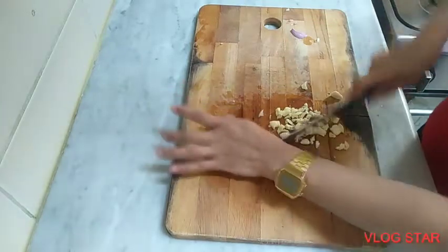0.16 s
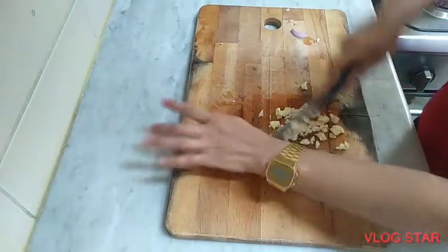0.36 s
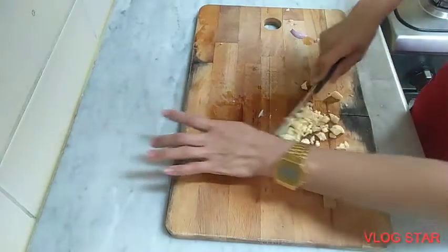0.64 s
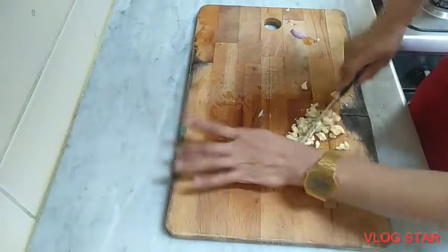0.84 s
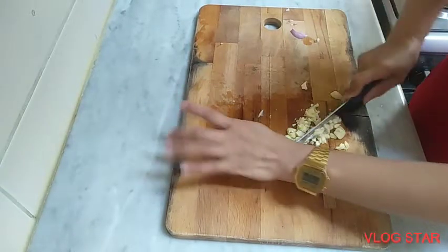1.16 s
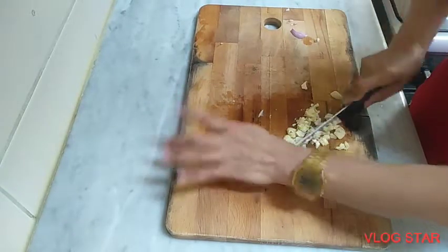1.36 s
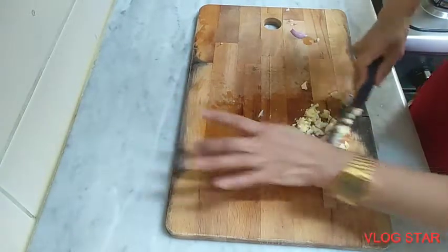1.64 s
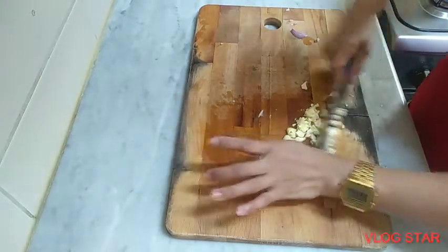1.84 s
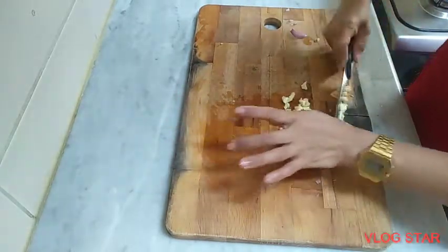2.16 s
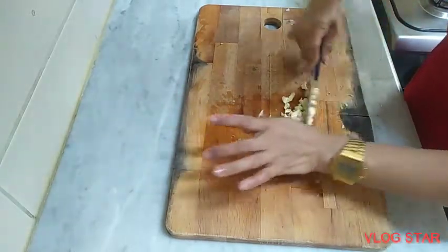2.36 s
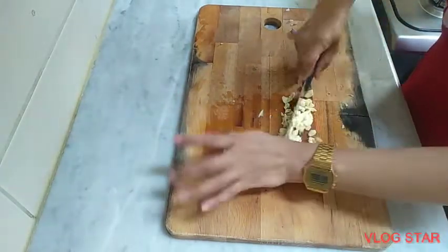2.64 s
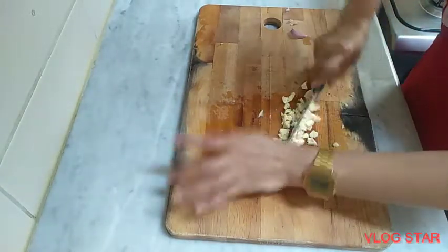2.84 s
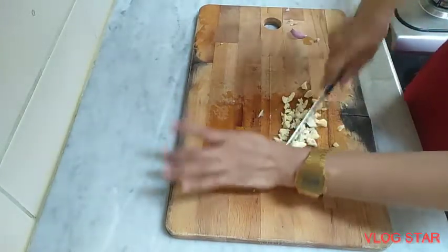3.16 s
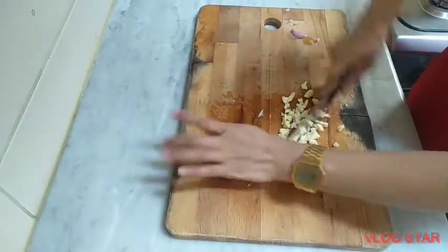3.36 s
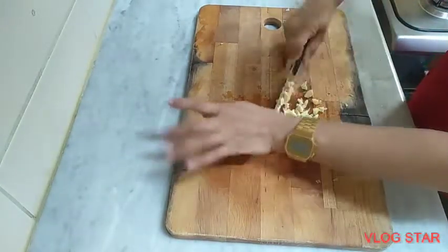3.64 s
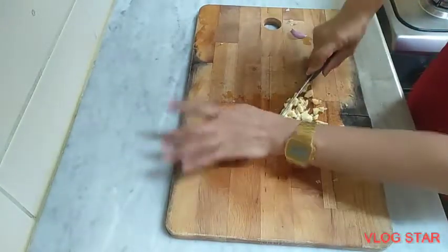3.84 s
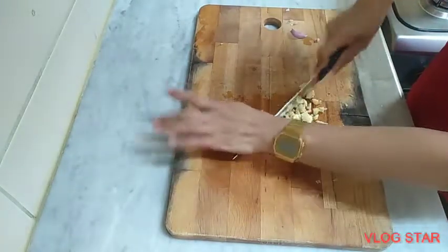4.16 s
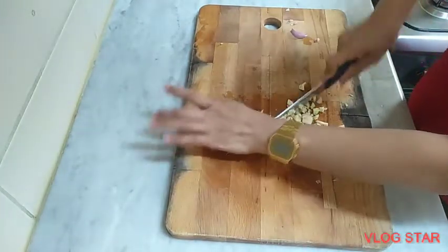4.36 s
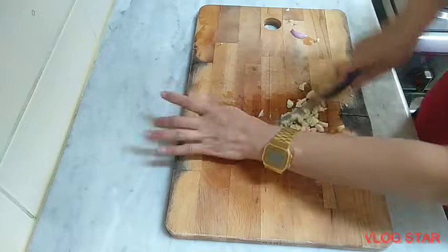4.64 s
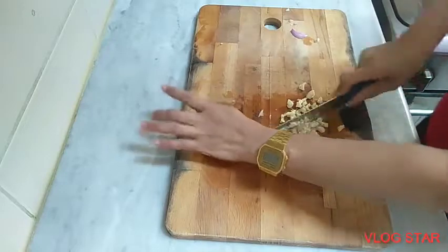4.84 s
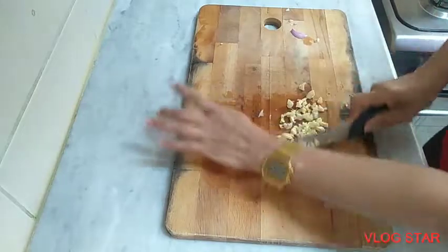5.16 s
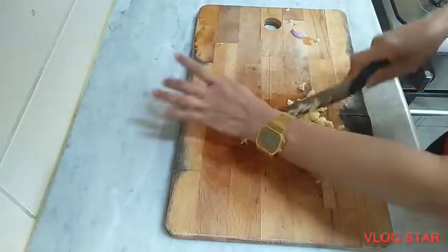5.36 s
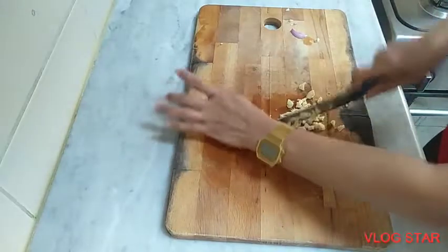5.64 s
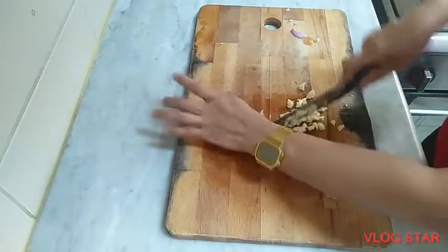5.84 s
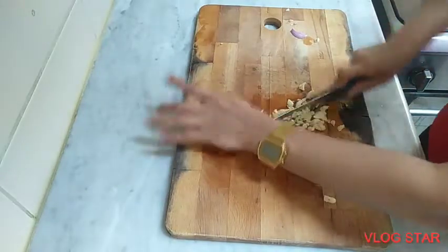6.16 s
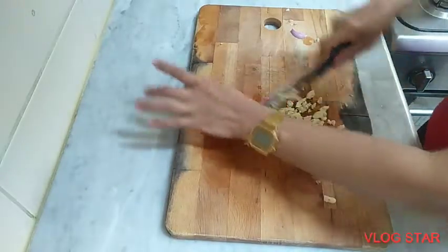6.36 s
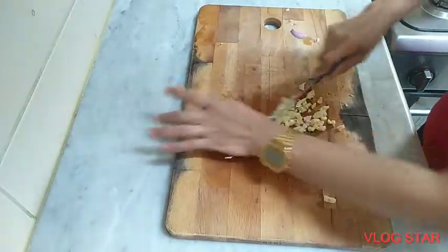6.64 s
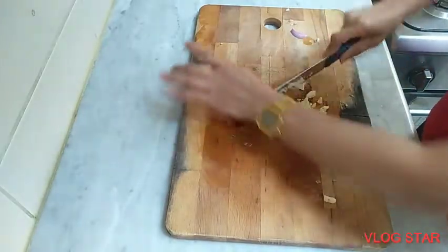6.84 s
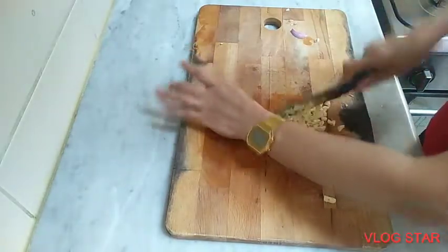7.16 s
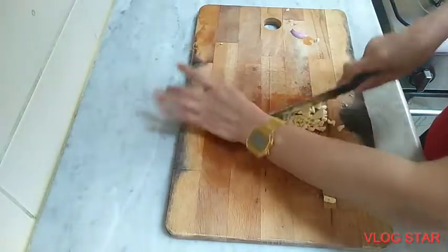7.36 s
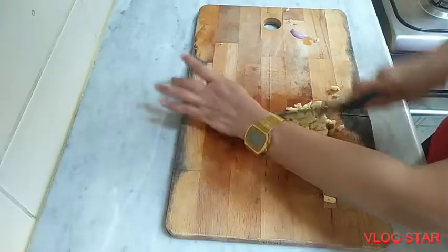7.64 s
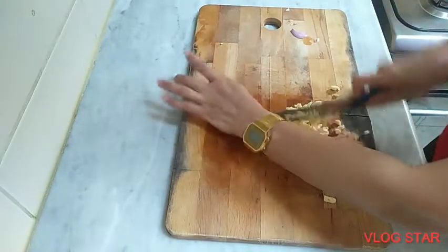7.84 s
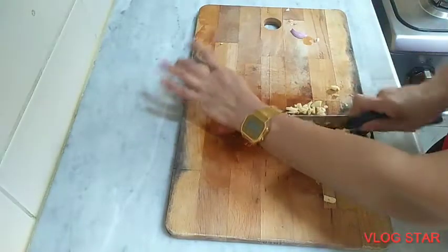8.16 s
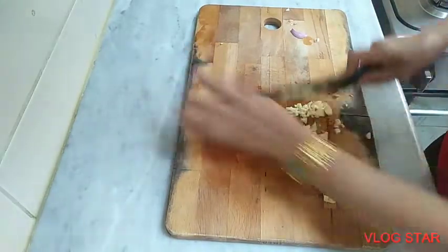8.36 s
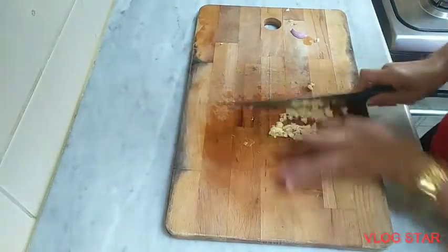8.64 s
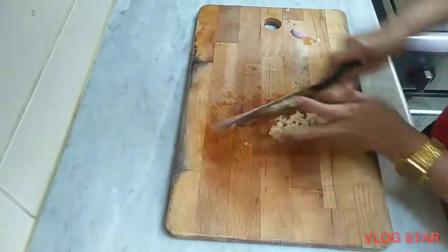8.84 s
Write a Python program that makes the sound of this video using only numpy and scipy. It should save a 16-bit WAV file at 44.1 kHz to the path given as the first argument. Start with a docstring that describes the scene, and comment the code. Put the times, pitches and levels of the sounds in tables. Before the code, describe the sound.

A steel knife minces garlic on a wooden board lying on a stone counter. Small moist crunches with light ticks and dull thuds come roughly four per second, broken by short hissing scrapes and much louder hollow wooden knocks. Knocks are sparse at first, then cluster near five to seven seconds and at the end. Close stereo microphone in a small, hard, tiled kitchen with short bright reverberation; the hardest blows slightly overload.

```python
"""Mincing garlic on a wooden board

A kitchen knife minces garlic on a wooden board lying on a stone counter, in a small tiled kitchen.
Blows on bare wood excite the damped modes of the board; sweeps and crunches are trains of tiny random
snaps, shaped by the force on the blade and filtered by what it touches. Echoes, standing waves and a
diffuse tail return every stroke; a close stereo microphone overloads on the hardest knocks."""
import sys
import numpy as np
from scipy import signal
from scipy.fft import rfft, irfft
from scipy.io import wavfile
from scipy.ndimage import uniform_filter1d

SR = 44100
rng = np.random.default_rng(int(sys.argv[2]) if len(sys.argv) > 2 else 0)


def unload_wav(signal):
    """Save mono or channel-first audio to the path in sys.argv[1] as 16-bit WAV at rate SR, clipped to [-1, 1]."""
    wavfile.write(
        sys.argv[1],
        SR,
        np.round(np.clip(np.atleast_2d(signal).T, -1, 1) * 32767).astype(np.int16),
    )


N = 396900  # samples, 9 s

# All spectra in level_db_per_hz are relative: the filters have unit energy.
# faint room noise: frequency_hz, level_db_per_hz
QUIET_SPECTRUM = [(20, -11), (50, -2.5), (120, -11), (220, -9), (400, -33), (1500, -42), (8000, -26),
                  (15000, -32)]
# near surfaces: left_delay_s, right_delay_s, level_db
ECHOES = [(.0009, 0.001, -10.5), (.0037, 0.0026, -5.5), (.0052, 0.005, -8), (.0072, 0.0035, -6.5),
          (.0096, 0.013, -12), (0.0108, 0.013, -20.5)]
# standing waves of the kitchen: frequency_hz, t60_s, energy_db (re direct sound)
STANDING_WAVES = [(99.23, 0.31, -20), (142.7, 0.4, -24.5), (185.3, 0.27, -23), (266, 0.5, -35),
                  (312, 1, -32), (628, 1, -39.5), (835, 0.15, -35), (925, 0.15, -26), (1502, 0.23, -37.5),
                  (1560, 0.092, -41)]
# reverberant level before build-up: frequency_hz, level_db (re direct sound)
TAIL_LEVEL = [(50, 6.5), (100, 14.5), (250, 7), (500, 4.5), (900, 0.5), (1400, -4.5), (2500, 1.5),
              (4000, 2.5), (8000, -1.83), (14000, -2)]
# reverberant decay: frequency_hz, t60_s
TAIL_T60 = [(60, 0.91), (160, 0.1), (420, 0.43), (1100, 0.41), (2900, 0.53), (7700, 0.47), (14000, 0.44)]
# reverberant build-up: frequency_hz, build_up_s
TAIL_BUILD_UP = [(100, 0.024), (300, 0.0047), (1000, 0.003), (8000, 0.0023)]
# left port minus right port: frequency_hz, difference_db
PORT_TILT = [(60, 5.5), (250, -7.5), (600, 2.5), (1300, -2.2), (2200, -0.5), (5000, -0.5), (7000, -5),
             (9000, 6.5), (14000, 3.5)]
# blade sweeping the board: greatest_force_s, length_s, hiss_db, rasp_db, judder_db
SCRAPES = [(0.669, .1, -33.5, -32, -41.5), (1.913, 0.14, -30, -31.5, -52), (2.297, 0.048, -43, -71, -57.5),
           (2.353, 0.059, -28.5, -30, -41.5), (3.679, 0.11, -44.5, -45.5, -36.5),
           (5.255, 0.16, -32, -26.5, -39), (5.757, 0.13, -43.5, -44.5, -54), (5.875, 0.13, -48, -47, -65),
           (6.689, .13, -33.5, -33, -45.5), (7.029, .07, -32, -40, -36.5), (7.279, 0.052, -33, -44, -41),
           (8.567, 0.064, -50, -72, -67), (8.674, 0.18, -36.5, -54.5, -37)]
# uneven stick and slip of the edge: multiple_of_judder_pitch, level_db_per_hz
JUDDER_SPECTRUM = [(.3, -39), (.6, -9), (.8, -8), (1.05, -2.5), (1.5, -8.5), (2.2, -17.5), (5, -48.5)]
# wood under a rubbing edge: frequency_hz, level_db_per_hz
RASP_SPECTRUM = [(300, -29), (650, -32), (880, 2.5), (1020, -8), (1250, 3.5), (1650, -4), (2100, -9.5),
                 (3000, -20.5), (5000, -29)]
# bursting garlic cells, also the hiss of swept pieces: frequency_hz, level_db_per_hz
CRUNCH_SPECTRUM = [(400, -14.5), (1500, -6), (2800, -5.5), (4000, -11), (5200, -8), (7000, -0.5), (8600, 1),
                   (10500, -8), (13800, -12), (15000, -32.5)]
# blade through the heap: give_way_s, bite_s (before it), crunch_db, sink_s (on to the board), thud_db
CHOPS = [(.012, 0.12, -38.5, .018, -34), (.235, 0.0075, -31.5, 0.016, -31),
         (.909, 0.0049, -26, 0.0027, -54), (1.177, 0.016, -35, 0.015, -47.5),
         (1.407, 0.02, -39, 0.00534, -35), (1.82, 0.032, -47.5, 0.0023, -56),
         (2.615, 0.0066, -30.5, 0.0035, -47), (2.903, .033, -28.5, 0.0019, -49),
         (3.129, 0.02, -30, 0.0042, -53.5), (3.351, 0.017, -28.5, 0.0029, -46),
         (3.874, 0.0063, -33, 0.03, -42), (4.094, 0.0073, -33.5, 0.021, -43.5),
         (4.325, 0.022, -37.5, 0.0046, -32), (4.529, 0.018, -33, 0.026, -46.5),
         (4.787, 0.032, -37, 0.0026, -47), (5.713, .006, -37, 0.0021, -58),
         (5.995, 0.062, -36, 0.0019, -65.5), (6.228, 0.031, -34.5, 0.0039, -41.5),
         (7.514, 0.025, -34, 0.0029, -47.5), (7.728, 0.0099, -24, 0.0026, -57),
         (7.976, 0.031, -34.5, 0.0025, -60.5), (8.189, 0.016, -29.5, 0.0027, -46.5)]
# blade on bare wood: start_s, level_db, hardness_hz (corner of the blow), place (0 mid-board to 1 near edge)
KNOCKS = [(.54, -11.5, 1460, 0.52), (0.8896, -7, 3190, 0.62), (1.822, -30.5, 1500, 0.27),
          (2.6168, -14.5, 994, 0.25), (3.6146, -10, 1065, 0.44), (5.145, -14.5, 1147, 0.42),
          (5.4867, -7, 1800, 0.43), (6.5814, -13, 1650, 0.35), (6.9322, -11, 950, 1),
          (7.222, -10, 2135, 0.43), (8.579, -9.5, 1126, 0.76), (8.97, -8, 3400, 0.46)]
# board with the blade on it, relative levels: frequency_hz, t60_s, mid_board_db, near_edge_db
BOARD_MODES = [(185, 0.04, -40.5, -40), (287.7, 0.061, -25.5, -30.5), (410, 0.035, -21, -25),
               (560, 0.062, -30, -29.5), (595, .033, -22.5, -20.5), (860, 0.018, -5.5, -4),
               (901.6, 0.028, -7, -3), (1217, 0.019, 3, -6), (1407, 0.017, 1, -2.5), (1659, 0.017, -9, 5),
               (2160, 0.011, -8, 0), (2297, 0.021, -4, -11), (2850, 0.017, -16, -18.5),
               (3400, .007, -22.5, -26), (5200, 0.0014, -17.5, -30)]
# board pressed on the counter: multiple_of_thud_pitch, level_db_per_hz
THUD_SPECTRUM = [(.25, -32.5), (.6, -5), (1, -2.5), (1.8, -7.5), (3.2, -8), (8, -47), (20, -71.5)]
# tick of the steel blade: frequency_hz, level_db_per_hz
BLADE_SPECTRUM = [(1500, -5), (2900, -10), (3900, -19), (5000, -11.5), (6000, -14.5), (7100, -3.5),
                  (8600, -8), (10500, -18), (14000, -24), (15500, -27.5)]
# short dry noise burst at the start of a knock: frequency_hz, level_db_per_hz
BURST_SPECTRUM = [(800, -20), (2000, -1), (3000, -2), (3600, 0), (4000, -12), (4800, -4.5), (6000, -9.5),
                  (9000, -22), (15000, -34.5)]

QUIET_DB = -72.5
# the knife moves about, so the tail passes from one shape to the next in this time
DRIFT_S = 0.8006
# upper band limit of the microphone channel
BAND_LIMIT_HZ = 14650
# the force builds for this share of a sweep, then lets go
SWEEP_RISE_SHARE = 0.66
# the edge rubs the wood first and meets the pieces a moment later
HISS_LAG_S = .008
# a faster sweep hisses louder and judders faster: pitch at the reference hiss, hiss growth with pitch
JUDDER_HZ, JUDDER_HISS_DB, HISS_DB_PER_OCTAVE = 307, -32.5, 9.5
# decay constant once the garlic gives way; tick re the crunch, less after a slow bite
RELEASE_S, SNAP_DB, SNAP_DB_PER_S = 0.0092, -5.5, -190
# landing rasp: its place between crunch and thud in level, an offset, and the bite's share of its swell
RASP_THUD_SHARE, RASP_DB, RASP_BITE_SHARE = 0.33, 1.5, 0.49
# a heavier landing is a shorter push, so its thud is higher: pitch at the reference thud, thud growth
LANDING_HZ, LANDING_DB, LANDING_DB_PER_OCTAVE = 155, -43, 29
# a harder blow brings out more steel: tick re the knock at the usual hardness, growth with hardness
STEEL_DB, USUAL_HARDNESS_HZ, STEEL_DB_PER_OCTAVE = -26, 1500, 8
# noise burst re the knock at the usual hardness, growth with hardness, decay constant
BURST_DB, BURST_DB_PER_OCTAVE, BURST_S = -24.5, 4, 0.0017
# a blow mid-board presses the counter most: thud re the knock there, change from there to the edge
MID_THUD_DB, THUD_CHANGE_TO_EDGE_DB = -14, -31


def amp(db):
    """The decibel is logarithmic: level to amplitude gain."""
    return 10 ** (np.asarray(db) / 20)


def read(points, hz):
    """Pitch is heard by ratio: a table of (Hz, value) is interpolated over log frequency."""
    f, value = np.transpose(points)
    return np.interp(np.log(hz + 1), np.log(f), value)


def add(mix, s, sound):
    """Superposition: a sound is summed into the mix at time s."""
    part = mix[max(round(s * SR), 0):][:len(sound)]
    part += sound[:len(part)]


def colour(x, points, size=4096):
    """Minimum phase: the folded cepstrum of a spectrum gives a causal filter of unit energy."""
    log_gain = np.log(amp(read(points, np.fft.rfftfreq(size, 1 / SR))))
    cepstrum = irfft(log_gain)[:size // 2]
    cepstrum[1:] *= 2
    taps = irfft(np.exp(rfft(cepstrum, size)))[:size // 2]
    return signal.oaconvolve(x, taps / np.linalg.norm(taps))[:len(x)]


def at_level(hit, db):
    """Energy normalisation: the energy of a hit, spread over 10 ms, has the given level."""
    energy = np.sum(hit ** 2)
    return amp(db) * hit / np.sqrt(energy / (SR / 100))


def ring(hz, t60, t):
    """Damped resonance: a sine that falls 60 dB in t60."""
    return np.exp(-np.log(1000) * t / t60) * np.sin(2 * np.pi * hz * t)


def room_noise():
    """Stationary noise: filtered random pressure, faint and mostly low."""
    return amp(QUIET_DB) * colour(rng.standard_normal(N), QUIET_SPECTRUM)


def reverberation(rise_s=.004, size=36000):
    """Diffuse field: stereo noise whose bass builds up last and whose bands decay at their own rates."""
    hz, t, z = signal.stft(rng.standard_normal((2, size)), SR, nperseg=512)
    t60 = read(TAIL_T60, hz)[:, None]
    build_up_s = read(TAIL_BUILD_UP, hz)[:, None]
    growth = 1 - np.exp(-(t / build_up_s) ** 2)
    decay = np.exp(-np.log(1000) * t / t60)
    unit_energy = np.sqrt(2 * np.log(1000) / (t60 * SR))  # of the decay alone
    level = amp(read(TAIL_LEVEL, hz))[:, None]
    tail = signal.istft(z * growth * decay * unit_energy * level, SR, nperseg=512)[1][:, :size]
    onset = 1 - np.exp(-(np.arange(size) / SR / rise_s) ** 2)
    return tail * onset


def kitchen(x, shared_hz=420, order=6, count=4, size=36000):
    """Room response: direct sound, near echoes, standing waves and a tail that changes as the knife moves."""
    t, near = np.arange(size) / SR, np.zeros((2, size))
    for left_s, right_s, db in ECHOES:
        near[[0, 1], [round(left_s * SR), round(right_s * SR)]] += amp(db)
    near = uniform_filter1d(near, size=4, axis=1)  # clutter scatters the treble of the echoes
    near[0, 0] = near[1, 1] = 1  # the direct sound reaches the left port one sample earlier
    for hz, t60, db in STANDING_WAVES:
        wave = ring(hz, t60, t)
        near += amp(db) * wave / np.linalg.norm(wave)
    out = signal.oaconvolve(x[None], near, axes=1)[:, :N]
    # long waves reach both ports alike
    high_pass = signal.butter(order, shared_hz, "high", fs=SR, output="sos")
    for k in range(count):
        # each tail fades in and out in turn, overlapping its neighbours
        turn = (np.arange(N) / SR / DRIFT_S + k) % count
        share = np.sin(np.pi / 2 * np.minimum(turn, 2))
        mid, side = reverberation()
        side = signal.sosfilt(high_pass, side)
        tail = np.array([mid + side, mid - side]) / np.sqrt(2)
        out += signal.oaconvolve((x * share)[None], tail, axes=1)[:, :N]
    return out


def grains(per_s, spread_db, clump_db, size=300):
    """Shot noise: dense tiny snaps of uneven size, louder and softer in clumps, at unit level."""
    clumps = uniform_filter1d(rng.standard_normal(N), size)
    uneven_db = spread_db * np.minimum(rng.exponential(1, N), 4)
    sizes_db = uneven_db + clump_db * np.tanh(clumps / clumps.std())
    happens = rng.random(N) < per_s / SR
    snaps = rng.standard_normal(N) * happens * amp(sizes_db)
    return snaps / snaps.std()


def scrapes(hiss_swell=.9, wood_swell=.7, size=16000):
    """Stick and slip: the edge drags wet pieces that hiss over wood that rasps and judders."""
    t, out = np.arange(size) / SR, np.zeros(N)
    slips = [np.pad(grains(per_s=4300, spread_db=-0.5, clump_db=5.0), (0, size)) for _ in range(3)]
    for s, length_s, hiss_db, rasp_db, judder_db in SCRAPES:
        rise_s = SWEEP_RISE_SHARE * length_s
        start = s - rise_s
        force = np.interp(t, [0, rise_s, length_s], [0, 1, 0])
        hiss, rasp, judder = (snaps[round(start * SR):][:size] for snaps in slips)
        judder_hz = JUDDER_HZ * 2 ** ((hiss_db - JUDDER_HISS_DB) / HISS_DB_PER_OCTAVE)
        judder_spectrum = [(multiple * judder_hz, db) for multiple, db in JUDDER_SPECTRUM]
        wood_force = force ** wood_swell
        add(out, start + HISS_LAG_S, amp(hiss_db) * colour(hiss * force ** hiss_swell, CRUNCH_SPECTRUM))
        add(out, start, amp(rasp_db) * colour(rasp * wood_force, RASP_SPECTRUM))
        add(out, start, amp(judder_db) * colour(judder * wood_force, judder_spectrum))
    return out


def pressure(since, rise_s, fall_s):
    """Loading and release: exponential swell up to time zero, exponential decay after it."""
    return np.exp(np.minimum(2 * since / rise_s, -since / fall_s))


def tick(db, chatter_s=0.00088, chatter_db=-15, size=2000):
    """Impulsive contact: one sharp meeting of the edge and a brief chatter, bright with steel."""
    decay = np.exp(-np.arange(size) / SR / chatter_s)
    chatter = amp(chatter_db) * rng.standard_normal(size) * decay
    return at_level(colour(signal.unit_impulse(size) + chatter, BLADE_SPECTRUM), db)


def thud(db, hz, size=4000):
    """Momentum transfer: the stroke presses the board against the counter in one dull push."""
    spectrum = [(multiple * hz, push_db) for multiple, push_db in THUD_SPECTRUM]
    return at_level(colour(signal.unit_impulse(size), spectrum), db)


def chops():
    """Fracture: the crunch swells until the garlic gives way with a tick; the blade lands with rasp and thud."""
    t, out, crunch, rasp = np.arange(N) / SR, np.zeros(N), np.zeros(N), np.zeros(N)
    for s, bite_s, crunch_db, sink_s, thud_db in CHOPS:
        near = abs(t - s) < .2
        since = t[near] - s
        rasp_db = RASP_DB + crunch_db + RASP_THUD_SHARE * (thud_db - crunch_db)
        rasp_rise_s = RASP_BITE_SHARE * bite_s + sink_s / 2
        crunch[near] += amp(crunch_db) * pressure(since, bite_s, RELEASE_S + sink_s / 2)
        rasp[near] += amp(rasp_db) * pressure(since - sink_s, rasp_rise_s, RELEASE_S)
        thud_hz = LANDING_HZ * 2 ** ((thud_db - LANDING_DB) / LANDING_DB_PER_OCTAVE)
        add(out, s, tick(crunch_db + SNAP_DB + SNAP_DB_PER_S * bite_s))
        add(out, s + sink_s, thud(thud_db, thud_hz))
    snaps = grains(per_s=8000, spread_db=3.0, clump_db=0.5)
    return out + colour(snaps * crunch, CRUNCH_SPECTRUM) + colour(snaps * rasp, RASP_SPECTRUM)


def board(db, corner_hz, place, size=6000):
    """Modal excitation: the place sets the share of each mode, a soft contact spares the high ones."""
    t, modes = np.arange(size) / SR, np.zeros(size)
    for k, (hz, t60, mid_db, edge_db) in enumerate(BOARD_MODES):
        share = amp(mid_db + place * (edge_db - mid_db))
        softness = np.sqrt(1 + (hz / corner_hz) ** 5)
        modes += (-1) ** k * share * ring(hz, t60, t) / softness
    return at_level(modes, db)


def noise_burst(db, size=1500):
    """Decaying noise: a short dry burst at the start of a knock, strongest around 2-4 kHz."""
    burst = rng.standard_normal(size) * np.exp(-np.arange(size) / SR / BURST_S)
    return at_level(colour(burst, BURST_SPECTRUM), db)


def knocks(thud_hz=150):
    """Impact: hardness sets the steel tick and the noise burst, the place on the board sets the thud."""
    out = np.zeros(N)
    for s, db, corner_hz, place in KNOCKS:
        octaves = np.log2(corner_hz / USUAL_HARDNESS_HZ)
        add(out, s, board(db, corner_hz, place))
        add(out, s, tick(db + STEEL_DB + STEEL_DB_PER_OCTAVE * octaves))
        add(out, s, noise_burst(db + BURST_DB + BURST_DB_PER_OCTAVE * octaves))
        add(out, s, thud(db + MID_THUD_DB + THUD_CHANGE_TO_EDGE_DB * place, thud_hz))
    return out


def scene():
    """Superposition of all knife work in the kitchen and a faint low room noise."""
    quiet = room_noise()
    return kitchen(scrapes() + chops() + knocks()) + quiet


def record(dry, gate_db=-84, depth_db=12, low_cut_hz=54, drive_db=-3.0):
    """Transduction: low cut, two ports of unlike colour, suppression of faint bands, overload, band limit."""
    low_cut = signal.butter(3, low_cut_hz, "high", fs=SR, output="sos")
    hz, _, z = signal.stft(signal.sosfilt(low_cut, dry), SR, nperseg=512)
    z = z * amp(np.outer([.5, -.5], read(PORT_TILT, hz)))[:, :, None]
    power = (abs(z) ** 2).mean(0)
    power = uniform_filter1d(power, size=5, axis=0)  # over frequency
    power = abs(uniform_filter1d(power, size=3, axis=1))  # over time
    cut_db = depth_db / (1 + power / amp(gate_db) ** 2)  # half the depth at the gate level
    gated = signal.istft(z * amp(-cut_db), SR, nperseg=512)[1][:, :N]
    driven = amp(drive_db) * gated
    clipped = driven / (1 + (driven / 1.05) ** 8) ** (1 / 8)  # saturates at 1.05
    low_pass = signal.firwin(201, BAND_LIMIT_HZ, window=("kaiser", 7), fs=SR)
    return signal.oaconvolve(clipped, low_pass[None], "same")


dry = scene()
out = record(dry)
unload_wav(out)
```